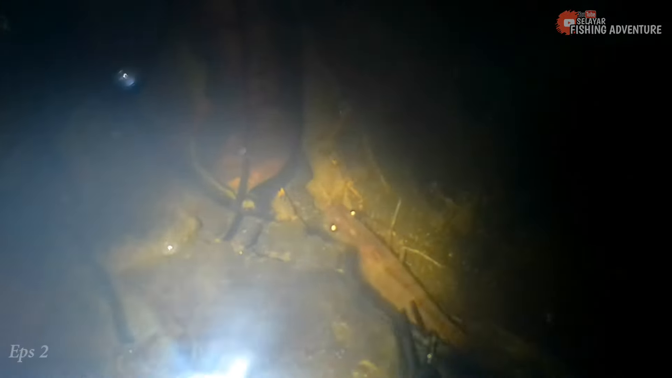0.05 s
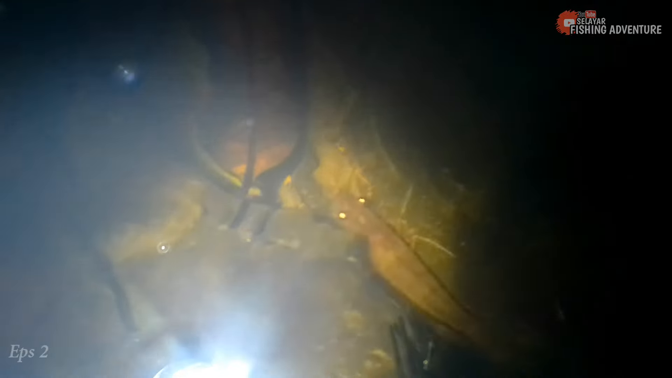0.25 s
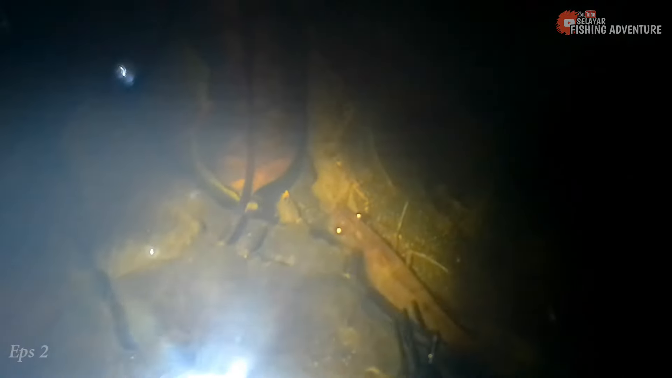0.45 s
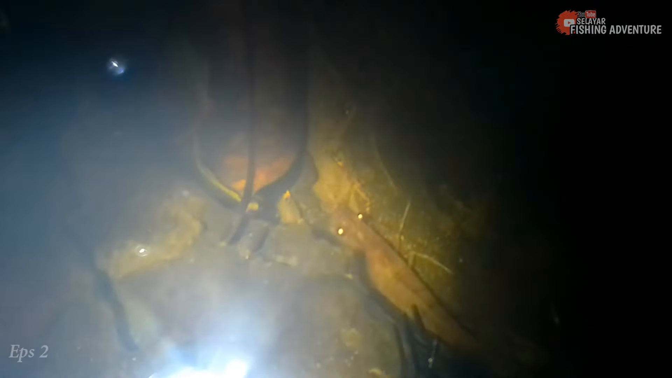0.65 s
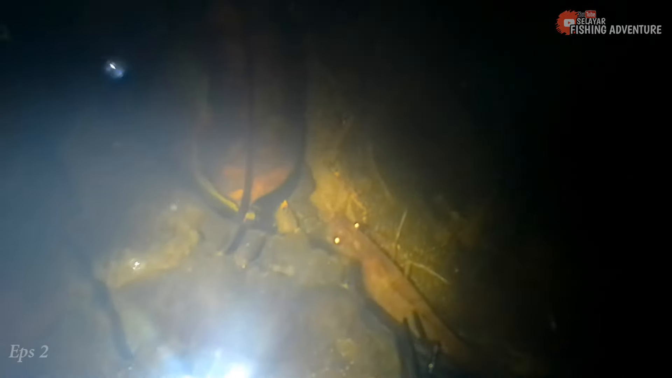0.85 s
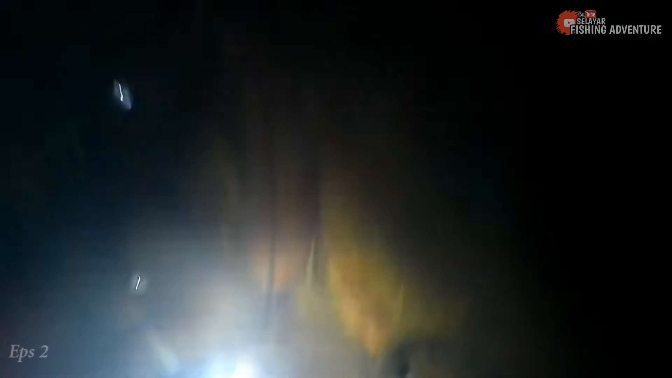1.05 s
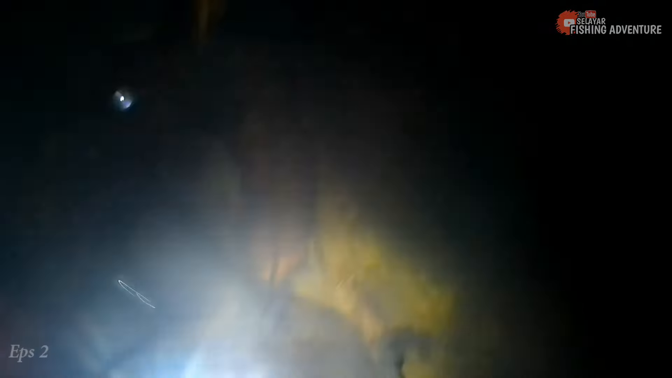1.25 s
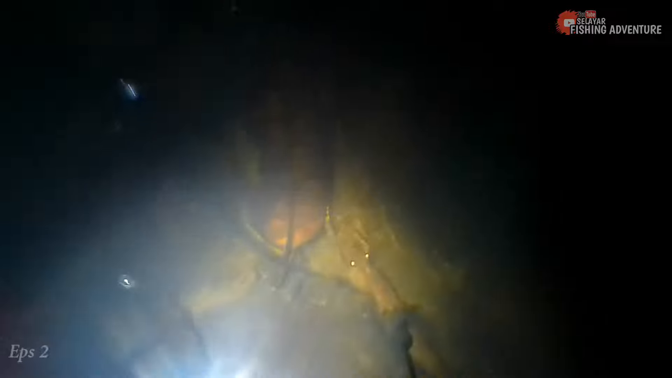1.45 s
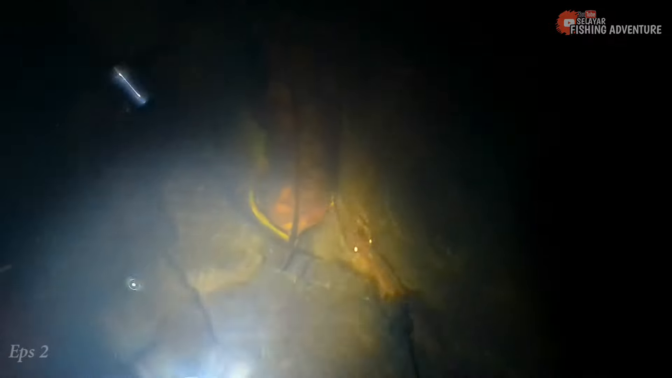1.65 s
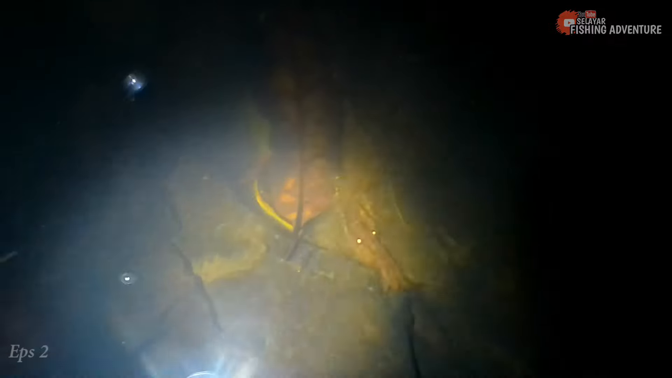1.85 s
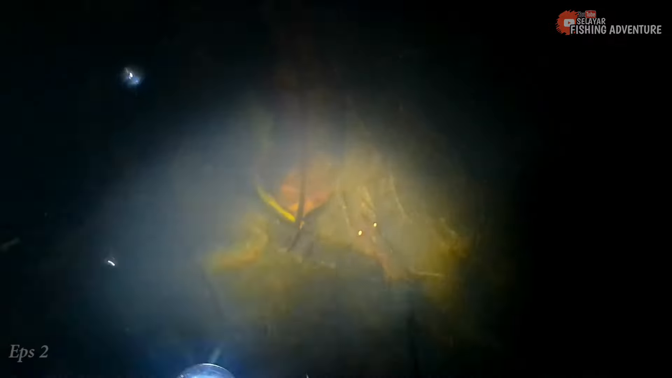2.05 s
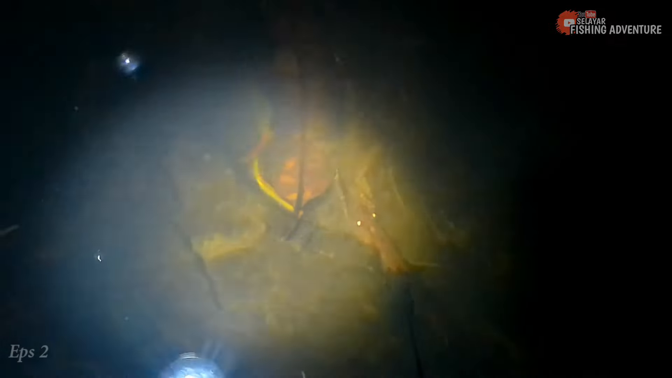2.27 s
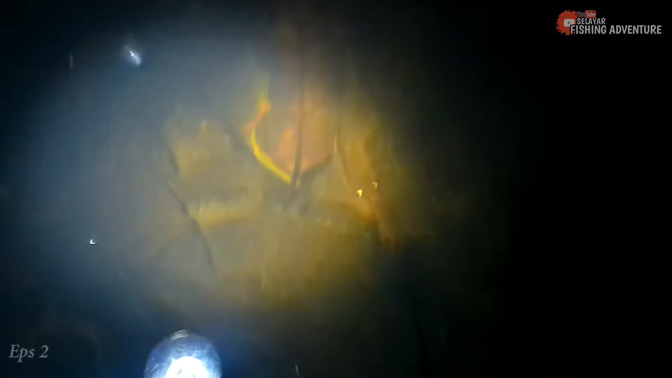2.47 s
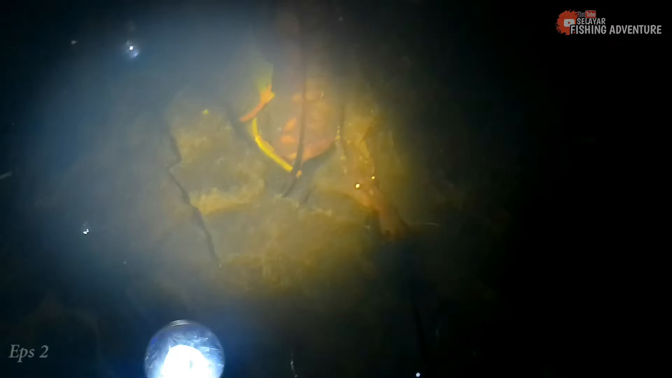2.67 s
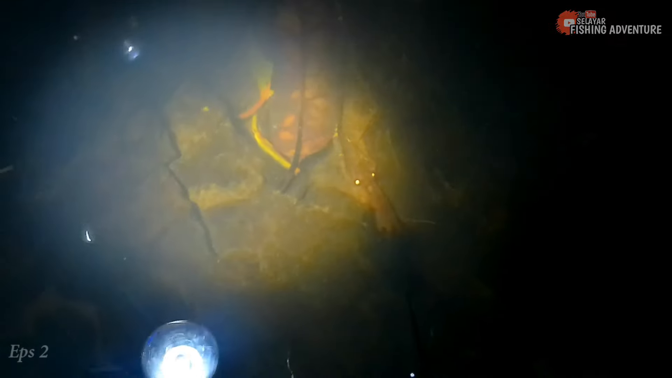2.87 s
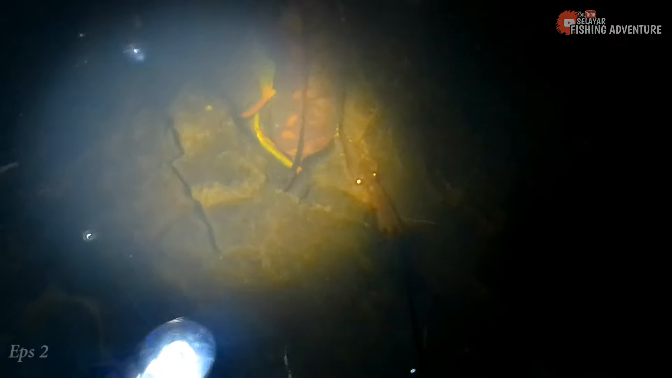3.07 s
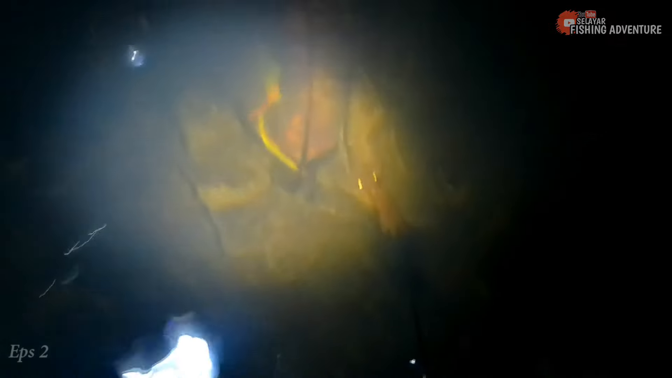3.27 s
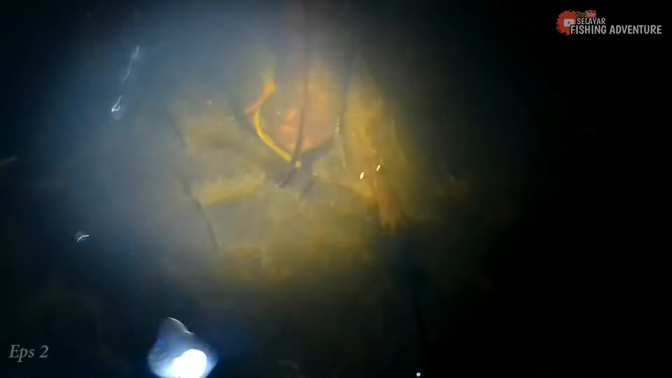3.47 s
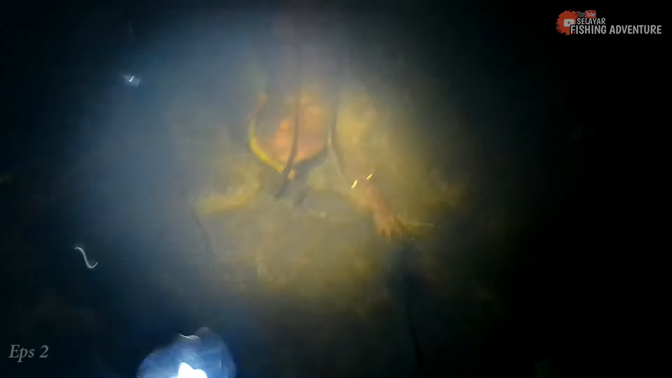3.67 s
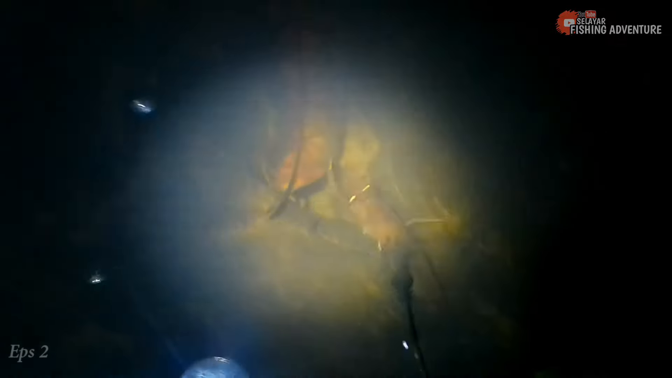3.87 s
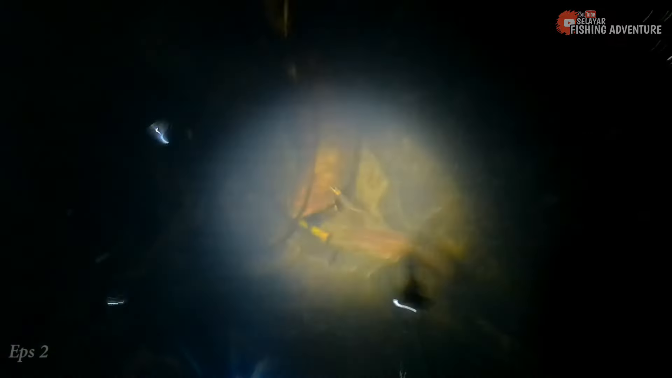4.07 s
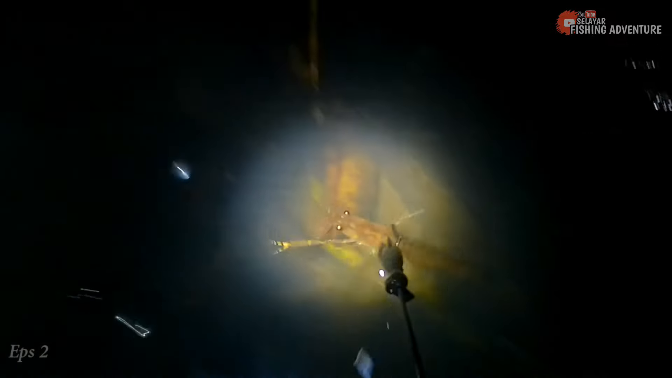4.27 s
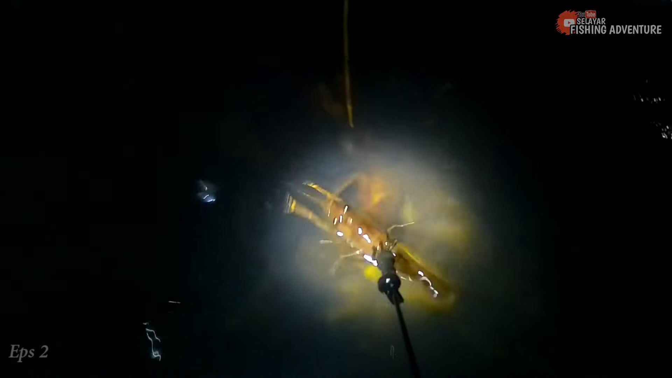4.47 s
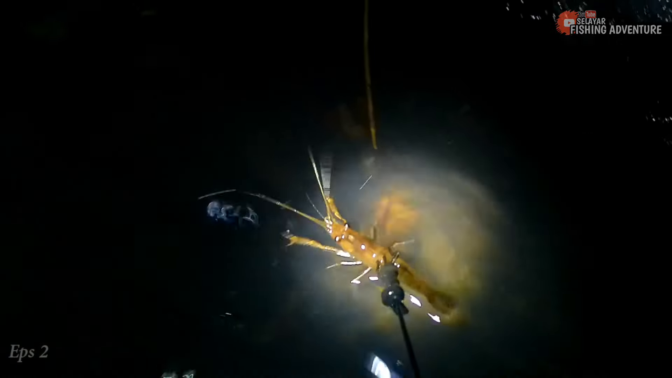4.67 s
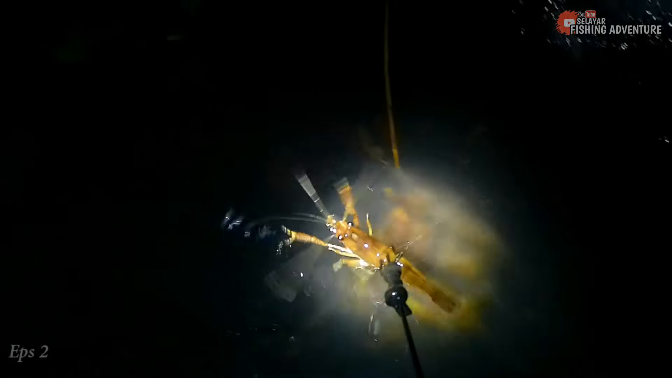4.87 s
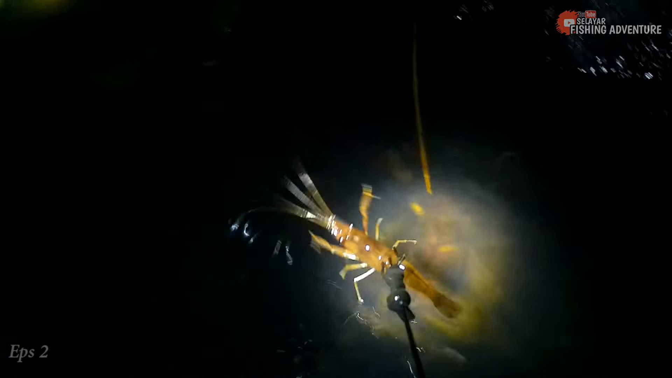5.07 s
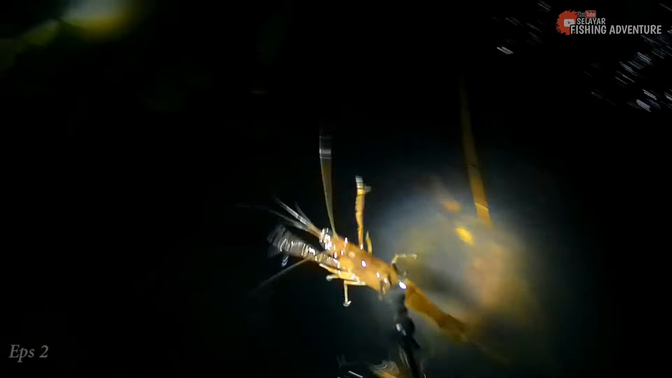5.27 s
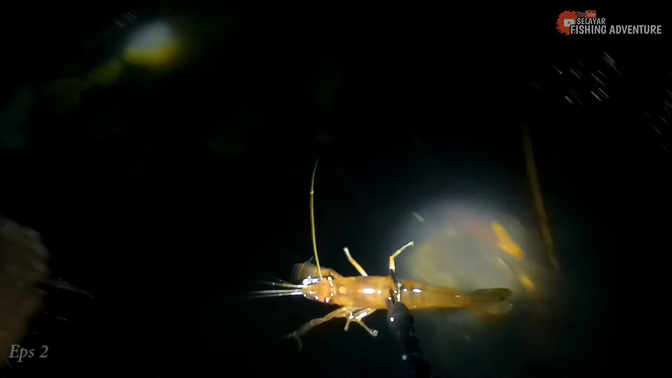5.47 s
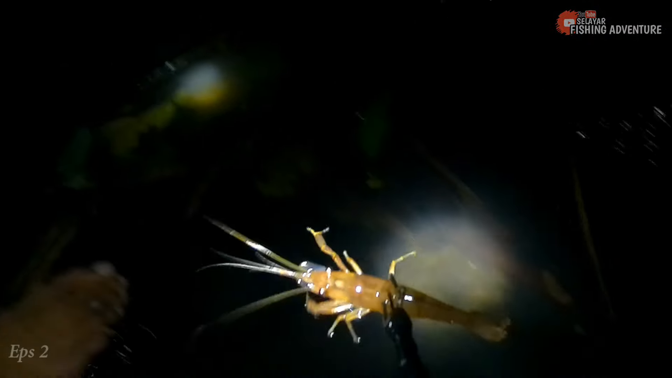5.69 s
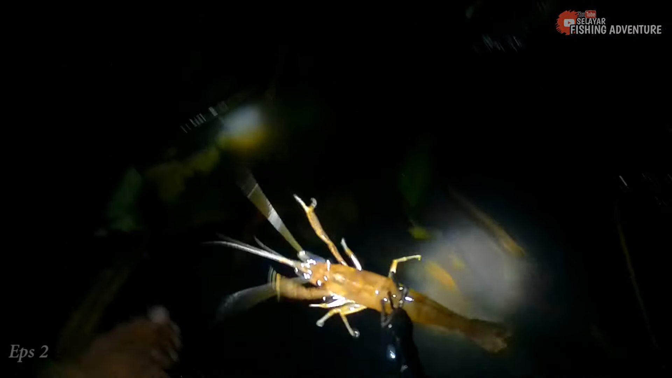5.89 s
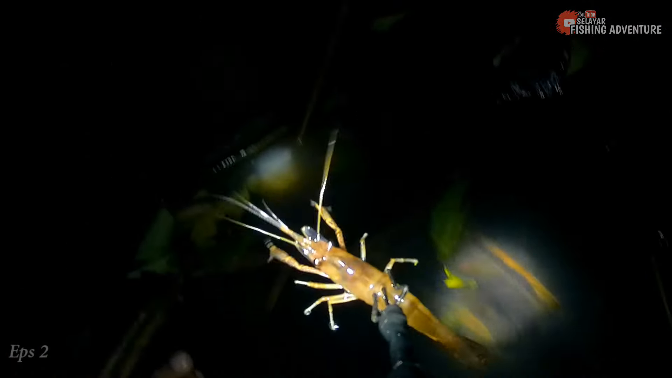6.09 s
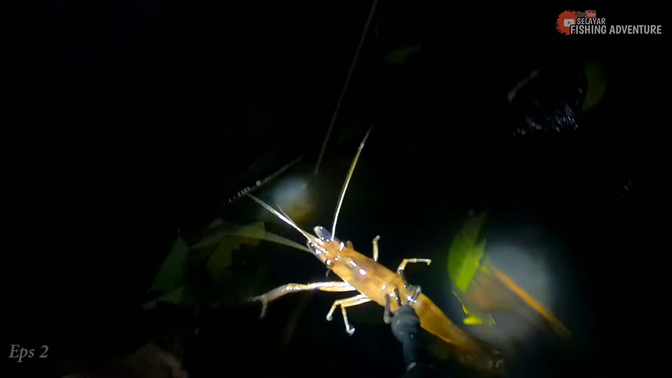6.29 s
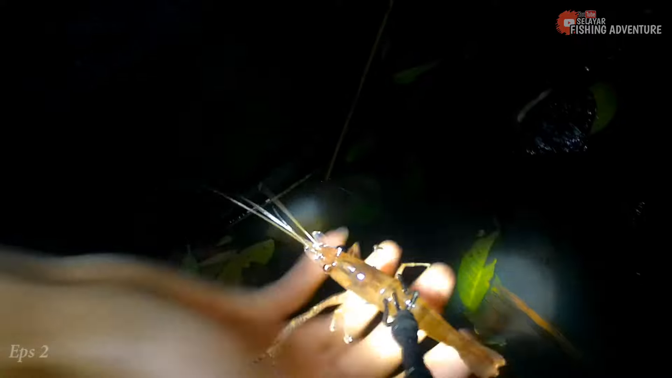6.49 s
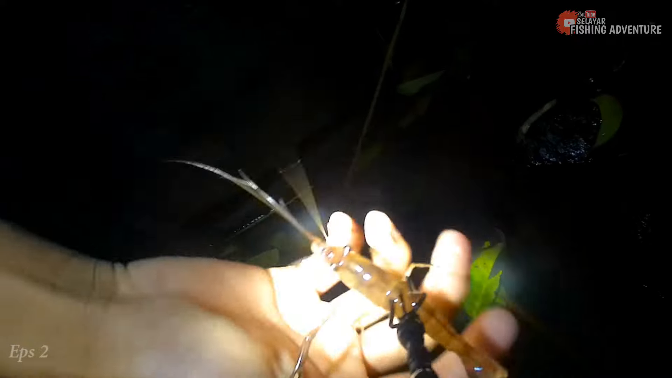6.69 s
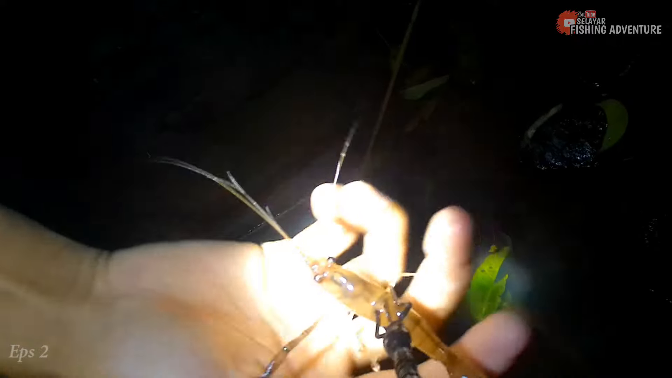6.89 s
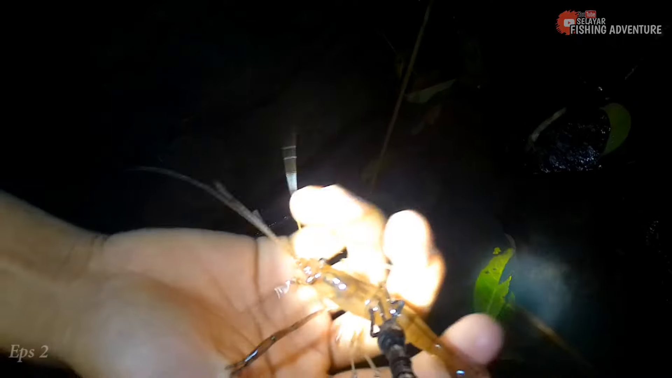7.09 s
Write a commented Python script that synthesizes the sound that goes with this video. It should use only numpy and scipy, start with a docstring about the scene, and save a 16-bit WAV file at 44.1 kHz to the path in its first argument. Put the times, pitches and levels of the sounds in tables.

```python
"""A waterproof camera in a river

A camera in a plastic case is handled at night, under water and lifted out of it. Water washes and
glugs along the shell while fingers stroke and tap it, so that it rings and sways. Two hard, rattling
knocks overload the microphone. In the pauses there is only a faint hiss and the camera's own ticking."""
import sys
import numpy as np
from scipy import signal
from scipy.fft import rfft, irfft
from scipy.io import wavfile
from scipy.ndimage import uniform_filter1d

SR = 44100
rng = np.random.default_rng(int(sys.argv[2]) if len(sys.argv) > 2 else 0)


def store_wav(level_fs):
    """Save 16-bit WAV to argv[1]."""
    pcm = np.round(np.clip(np.atleast_2d(level_fs), -1, 1) * 32767)
    wavfile.write(sys.argv[1], SR, pcm.T.astype(np.int16))


N = 314641
TIME = np.arange(N) / SR
RING_TIME = np.arange(SR // 4) / SR

# Levels are relative. "Boom" and "edge" say how much louder the walls and the edge are than the shell.
# notes the case rings at: f/Hz, level/dB, time to fade by 60 dB/s
CASE_NOTES = [(252, -12, 0.098), (376, -20.5, .1), (386, -17, .09), (473.1, -25, 0.13), (536.8, -18, 0.02),
              (585.3, -3, 0.025), (625.8, -14, 0.07), (797, 0, 0.011), (1134, -14.5, 0.002),
              (1220, 1, 0.013), (1410, -8, 0.021), (1560, 2, 0.012), (1743, -7, 0.013),
              (1937, -12.5, 0.028), (2568, -7, 0.0074), (3701, -19, .008), (4196, -15.5, .008),
              (6260, -26.5, 0.014)]
# hard blows that make up the knocks: t/s, level/dB, time to fade to 37%/s, boom/dB
BLOWS = [(1.0635, 5, 0.013, -5), (1.073, 10.5, 0.0098, -5), (1.087, 2, 0.022, -15),
         (1.104, -4, 0.0034, -16), (1.120, 6.5, .013, -5.5), (1.150, -9.5, 0.011, -5),
         (1.163, 6, 0.0097, -3), (1.2018, -2.5, 0.008, -1), (1.2431, -6.5, 0.0022, 1),
         (3.309, -15, 0.0064, -18), (3.317, -1.5, 0.009, -15.5), (3.322, 6.5, 0.011, -3),
         (3.337, -0.5, 0.0082, 0.5), (3.348, 2.5, 0.0088, -18.5), (3.365, -4.5, 0.0084, -7),
         (3.373, -5.5, 0.0082, -4.5), (3.4022, 0, 0.0053, -14.5), (3.413, -39.5, 0.0053, 25.5),
         (6.642, -18, 0.00053, -4)]
# finger taps and creaks: t/s, level/dB, f/Hz, half-length of the skid/s, boom/dB, edge/dB
TAPS = [(.0958, -22, 1640, 0.0015, 8.5, -18), (0.1117, -29, 1750, 0.0018, -1, -47),
        (.139, -31.5, 1760, 0.0018, 4, -21), (1.924, -16, 1297, 0.0012, -11, -40),
        (2.378, -25, 1400, 0.0013, 2, -25), (2.396, -8, 1450, .0014, -6, -17.5),
        (2.535, -15, 1400, 0.0011, -12, -56), (2.575, -12.5, 1224, 0.0019, -9.5, -60),
        (2.594, -15, 1480, 0.00085, 2, -27), (2.6181, 3.5, 1515, 0.0025, -14, -32),
        (2.622, -3.5, 1355, 0.0016, -3.5, -25), (2.654, -15, 1606, 0.0012, -5, -13),
        (2.737, -26, 1400, 0.0022, -3, -39), (2.962, -31, 1240, 0.0031, -11, -17),
        (3.02, -25.5, 1373, 0.0022, 3, -17), (3.137, -25, 1560, 0.0012, -13, -21.5),
        (3.549, -22, 1487, 0.0013, -24, -45.5), (3.757, -41.5, 1590, .003, -14, -40),
        (3.839, -36, 1470, 0.0015, -13.5, -36), (4.06, -29.5, 1410, .0014, 9, -48.5),
        (4.155, -9, 1376, 0.0013, -14.5, -36), (4.236, -12.5, 1220, .0022, -8.5, -60),
        (4.638, -33, 1447, .002, -8, -49.5), (4.664, -22.5, 1380, 0.0011, -3, -55),
        (5.091, -12, 1436, 0.0013, -9, -43), (5.318, -4, 1560, 0.0014, -11.5, -25.5),
        (5.324, -9.5, 1310, 0.0018, -26, -18.5), (5.435, -13, 1640, 0.0032, -11, -15),
        (5.546, -15.5, 1520, 0.0028, -8.5, -14), (5.815, -25.5, 1450, 0.0014, -13, -45),
        (6.198, -21.5, 1619, .0014, -29, -50), (6.205, -24, 1450, .0014, -17, -52),
        (6.637, -6.5, 1242, 0.0017, -14.5, -41), (6.6425, 2.5, 1370, 0.0013, -20.5, -33.5),
        (6.682, -10.5, 1230, 0.0019, -18.5, -51), (6.776, -17, 1340, 0.0017, -22.5, -61),
        (6.792, -8, 1424, 0.0029, -13, -47), (6.8393, -6, 1445, 0.002, -13, -53),
        (6.865, -24, 1410, 0.0008, -6.5, -51.5), (6.898, -20.5, 1410, 0.0049, -6, -40),
        (6.913, -12.5, 1530, 0.0045, -14, -32), (6.928, -7.5, 1710, 0.0034, -15.5, -35.5),
        (6.958, -30.5, 1810, 0.00064, 1, -23), (6.985, -33, 1570, .0012, -18.5, -46.5),
        (7.008, -32, 1560, 0.0018, -18, -48), (7.04, -21, 1406, .0012, -14, -57)]
# finger strokes: t/s, length/s, level/dB, swell from start to end/dB, boom/dB, edge/dB, sway level/dB
STROKES = [(.1, 0.051, -41, -22.5, -2.5, -26, -37), (0.549, 0.022, -68.5, -3.5, -10.5, -14, -81),
           (1.101, .115, -26, -12.5, -2, -13, -15.5), (1.25, 0.012, -30.5, -5.5, -2, -17.5, -32),
           (1.409, .11, -47.5, -1, 4, -15, -36), (1.658, 0.13, -47, -0.5, 5, -17, -40.5),
           (1.909, 0.031, -52, 6, 7, -15, -42.5), (2.178, 0.13, -59.5, -9.5, -8, -15.5, -59.5),
           (2.373, 0.047, -35, 0.5, -1.5, -22.5, -28.5), (2.446, 0.037, -35, 4, -5.5, -30, -48),
           (2.492, 0.1, -31.5, 13.5, -7, -43, -43), (2.641, 0.028, -30, 2.5, 3, -17, -49),
           (2.732, 0.059, -36.5, 5, -0.5, -22.5, -36), (2.998, .024, -36.5, 11, 2, -27, -41),
           (3.098, 0.041, -33.5, 7.5, -6, -38, -40.5), (3.253, 0.055, -48, 21, -14, -48, -44),
           (3.448, .13, -43, -8, 4, -30, -51.5), (3.766, .02, -48, -8, 4, -33, -51),
           (3.805, 0.052, -40.5, -18, 3.5, -27.5, -51.5), (3.923, 0.013, -52, -12.5, 14.5, -33, -42),
           (4.055, 0.011, -36.5, 16, -1, -32, -48), (4.16, 0.0095, -38.5, -14, 4, -19.5, -37.5),
           (4.232, 0.012, -40.5, -6, -2, -40, -53), (4.408, .12, -63.5, 1.5, -7, -21, -67.5),
           (4.632, 0.026, -48, -11.5, -4, -48, -77), (4.998, 0.1, -41.5, 17.5, -0.5, -26.5, -46.5),
           (5.222, 0.11, -30.5, 11.5, -8, -31.5, -48), (5.321, 0.081, -26.5, -13.5, -9, -23, -42.5),
           (5.404, 0.15, -24, 4.5, -7, -22, -34.5), (5.555, 0.062, -31.5, -10, -5.5, -21.5, -42),
           (5.689, 0.057, -74, -0.5, -10, -12, -70), (5.804, .12, -42, 4, -4, -29, -44.5),
           (6.472, 0.024, -67, 0, -18.5, -5, -77.5), (6.647, 0.0099, -40.5, -7.5, -7.5, -11, -53),
           (6.845, 0.017, -42, -10, 2, -25, -51), (6.957, 0.012, -37, -12, 0.5, -29, -58),
           (7.051, 0.016, -38.5, 12, 1, -38, -72)]
# water moving along the case: t/s, wash level/dB, sway level/dB
WATER_FLOW = [(0, -105, -67), (.8, -105, -74), (1.05, -92, -60), (1.26, -50.5, -23), (1.36, -64, -39.5),
              (1.63, -51, -49), (1.85, -71, -45), (1.98, -67, -41), (2.12, -88.5, -72), (2.34, -73.5, -60),
              (2.43, -56, -40), (2.87, -66.5, -69), (3.08, -59, -45), (3.2, -79, -62.5), (3.45, -52.5, -46),
              (3.64, -60, -51), (3.8, -57, -54.5), (3.9, -63, -59.5), (4.04, -59, -48), (4.12, -78, -55.5),
              (4.36, -100, -71.5), (7.13, -108, -78)]
# jolts of the whole case: t/s (at their strongest), level/dB, f/Hz
JOLTS = [(0.111, -30.5, 60.5), (1.079, -1, 78), (1.104, -5.5, 45.4), (1.182, -4.5, 43.2),
         (1.223, -18, 44.7), (1.454, -31, 74), (1.504, -27, 71.7), (1.776, -19.5, 68.4), (1.93, -31, 54.2),
         (2.411, -33, 72.6), (2.786, -28, 45.7), (3.142, -28, 53.7), (3.327, -16.5, 100),
         (3.431, -13.5, 44.2), (3.938, -30.5, 48.5), (4.187, -23, 57.87), (5.91, -28.5, 46.14)]
# low rumble of the swaying case: f/Hz, level/dB
SWAY_SPECTRUM = [(15, -17), (30, -9.5), (42, 2), (70, -2.5), (100, -13), (160, -19.5), (260, -24),
                 (500, -59.5), (1500, -100)]
# water slapping a wall of the case: t/s, level/dB, f/Hz, time to fade to 37%/s
GLUGS = [(.0945, -8.5, 545, 0.0045), (0.116, -36.5, 379, 0.027), (0.124, -41.5, 531, 0.031),
         (1.175, -10, 490, 0.013), (1.248, -24, 217.5, 0.029), (1.925, -12.5, 605, 0.0039),
         (2.391, -17, 186, 0.0045), (2.625, -47, 529, 0.01), (3.004, -14, 517, 0.0038),
         (3.133, -27.5, 381, 0.016), (3.484, -29.5, 517, 0.018), (3.549, -25.5, 545.6, 0.012),
         (3.917, -39, 396, 0.023), (4.03, -37.5, 361.7, 0.028), (4.239, -47, 378, 0.01),
         (4.664, -30.5, 381.8, 0.014), (4.998, -30.5, 578, 0.007), (5.05, -31.5, 526, 0.021)]
# notes the ticking mechanism rings at: f/Hz, level/dB, time to fade by 60 dB/s
TICK_NOTES = [(490, -19.5, 0.045), (1300, -19, .01), (2190, -1, 0.027), (2270, -3, 0.035),
              (4482, -14, 0.033), (5640, -21.5, .006)]
# steady background hiss: f/Hz, level/dB
HISS_SPECTRUM = [(20, 8), (45, -3.5), (90, -11.5), (200, -16.5), (500, -24.5), (800, -24), (2000, -32.5),
                 (3500, -34), (7000, -40.5), (16000, -47.5)]


def knocking(walls, shell, edge, edge_db=-19, shove_db=-12):
    """Each blow is a dying burst of hard contacts that also shoves the whole case."""
    out = np.zeros(N)
    struck = band(shell, 1100, 2300, order=1)  # a hard contact favours the shell's higher notes
    shove = band(signal.unit_impulse(len(RING_TIME)), 130, 280, order=2)
    for start, db, fade_s, boom in BLOWS:
        chatter = rng.choice([-1, 1], len(RING_TIME)) * np.exp(-RING_TIME / fade_s)
        clack = shake(chatter, struck)
        thud = shake(chatter, walls) + amp(shove_db) * shake(chatter, shove)
        click = shake(chatter, edge)
        add(out, start, amp(db) * (clack + amp(boom) * thud + amp(edge_db) * click))
    return out


def tapping(walls, shell, edge, gain_db=-2.5, boom_db=-1, edge_db=-2, roughness=2.77):
    """A fingertip catches and lets go: a brief flutter near one pitch inside a longer, gritty skid."""
    out = np.zeros(N)
    t = np.arange(-500, 501) / SR
    for middle, db, hz, skid_s, boom, edge_level in TAPS:
        grit = rng.standard_normal(len(t)) / np.cosh(t / skid_s) * np.hanning(len(t))
        flutter = np.exp(-.5 * (t / (.63 * skid_s)) ** 2) * np.cos(2 * np.pi * hz * t)
        clack = strike(flutter + roughness * grit, shell)
        thud = amp(boom + boom_db) * strike(grit, walls)
        click = amp(edge_level + edge_db) * strike(grit, edge)
        add(out, middle + t[0], amp(db + gain_db) * (clack + thud + click))
    return out


def rubbing(walls, shell, edge, edge_lift_db=1):
    """Skin and water drag over the case; the same tiny slips ring all of its parts."""
    wall_db, shell_db, edge_db = pressing()
    drag = gurgle(slips())
    rub = shake(drag * amp(shell_db), shell)
    boom = shake(drag * amp(wall_db), walls)
    scratch = shake(drag * amp(edge_db + edge_lift_db), edge)
    return (rub + boom + scratch)[:N]


def slips(per_s=1600, spread_db=3.2):
    """Sticking and slipping makes a stream of tiny pushes of uneven size."""
    size = amp(spread_db * np.minimum(rng.exponential(1, N), 4))
    return unit_power(size * rng.choice([-1, 1], N) * (rng.random(N) < per_s / SR))


def gurgle(sound, depth_db=3.8):
    """Shifting fingers and water press unevenly on the case, so its notes swell and fade in patches."""
    spectra = signal.stft(sound, nperseg=1024, noverlap=768)[2]
    patches = rng.standard_normal(spectra.shape[::-1]).T
    for size in (4, 5):  # blur across pitch and time
        patches = uniform_filter1d(uniform_filter1d(patches, size, axis=0), size, axis=1)
    gain = amp(depth_db * (unit_power(patches) - 1))
    return signal.istft(spectra * gain, nperseg=1024, noverlap=768)[1][:N]


def pressing():
    """How hard water and fingers push the walls, shell and edge, in dB; the strongest contact wins."""
    times, wash_db, _ = np.transpose(WATER_FLOW)
    shell = np.interp(TIME, times, wash_db)
    walls, edge = shell + 6, shell - 18.5  # water mostly stirs the walls, hardly the edge
    for start, length, db, swell, boom, edge_level, _ in STROKES:
        level = db + stroke_shape(start, length, swell, rise_db_per_s=2800, fall_db_per_s=1150)
        shell = np.maximum(shell, level)
        walls = np.maximum(walls, level + boom)
        edge = np.maximum(edge, level + edge_level)
    return walls, shell, edge


def stroke_shape(start, length, swell_db, rise_db_per_s, fall_db_per_s):
    """One stroke in dB: it builds up, swells or fades evenly over its length, then dies away."""
    hold = swell_db * (np.clip((TIME - start) / length, 0, 1) - .5)
    before = rise_db_per_s * np.maximum(start - TIME, 0)
    after = fall_db_per_s * np.maximum(TIME - start - length, 0)
    return np.maximum(hold - before - after, -200)


def case_parts():
    """The three voices of the case: booming walls, the hollow clack of the shell, a thin edge."""
    whole = ring(CASE_NOTES)
    high = ring([note for note in CASE_NOTES if note[0] > 2200])
    return band(whole, 370, 900, order=3), band(whole, 1000, 2022, order=4), band(high, 1200, 5200, order=3)


def wobbling(rise_s=.016, gain_db=-1):
    """The case swings for a few slow cycles after each jolt."""
    out = np.zeros(N)
    age = RING_TIME / rise_s
    swell = (age * np.exp(1 - age)) ** 2
    for peak_s, db, hz in JOLTS:
        add(out, peak_s - rise_s, amp(db + gain_db) * swell * np.sin(2 * np.pi * hz * RING_TIME))
    return out


def swaying(lag_s=.01):
    """Water and strokes rock the heavy case: it rumbles, follows each stroke late and settles slowly."""
    times, _, flow_db = np.transpose(WATER_FLOW)
    level = np.interp(TIME, times, flow_db)
    for start, length, _, swell, _, _, db in STROKES:
        shape = stroke_shape(start + lag_s, length, swell, rise_db_per_s=998, fall_db_per_s=482.5)
        level = np.maximum(level, db + shape)
    return amp(level) * coloured_noise(SWAY_SPECTRUM)


def glugging(rise_s=.0017, gain_db=2):
    """Each slap of water rings one low, hollow note with a soft start."""
    out = np.zeros(N)
    for start, db, hz, fade_s in GLUGS:
        swell = (1 - np.exp(-(RING_TIME / rise_s) ** 2)) * np.exp(-RING_TIME / fade_s)
        add(out, start, amp(db + gain_db) * swell * np.sin(2 * np.pi * hz * RING_TIME))
    return out


def ticking(level_db=-58, spread_db=1.5, period_s=.054, jitter_s=.004, touch_s=.0012, rasp=.08):
    """A small mechanism in the camera ticks softly, not quite evenly."""
    out = np.zeros(N)
    body = band(ring(TICK_NOTES), 400, 6000, order=3)
    t = np.arange(-200, 201) / SR
    for count, (late, loud) in enumerate(rng.standard_normal((135, 2))):
        touch = (t == 0) + rasp * rng.standard_normal(len(t)) / np.cosh(t / touch_s)
        start = (count + .5) * period_s + jitter_s * late
        add(out, start, amp(level_db + spread_db * loud) * strike(touch, body))
    return out


def hiss(level_db=-67.5):
    """A faint, steady noise, strongest in the bass, lies under everything."""
    return amp(level_db) * coloured_noise(HISS_SPECTRUM)


def ring(notes):
    """Notes that die away after one sharp push."""
    return sum(amp(db) * np.exp(-np.log(1000) * RING_TIME / fade_s) * np.sin(2 * np.pi * hz * RING_TIME)
               for hz, db, fade_s in notes)


def shake(pushes, part):
    """Random pushes ring a part of the case and keep about the same power."""
    return signal.fftconvolve(pushes, part / np.linalg.norm(part))


def strike(push, part):
    """A short push rings a part; the result peaks at 1."""
    sound = signal.fftconvolve(push, part)
    return sound / abs(sound).max()


def coloured_noise(spectrum):
    """Noise of power 1 with the given balance of low and high pitches."""
    hz, db = np.transpose(spectrum)
    gain = amp(np.interp(np.log(np.fft.rfftfreq(N, 1 / SR) + 1), np.log(hz), db))
    return unit_power(irfft(rfft(rng.standard_normal(N)) * gain, N))


def band(sound, low_hz, high_hz, order):
    """Keeps the pitches between two limits."""
    return signal.sosfilt(signal.butter(order, [low_hz, high_hz], "band", fs=SR, output="sos"), sound)


def amp(db):
    """Turns decibels into a gain."""
    return 10 ** (np.asarray(db) / 20)


def unit_power(sound):
    """Scales to an average power of 1."""
    return sound / np.sqrt(np.mean(sound ** 2) + 1e-30)


def add(mix, start_s, sound):
    """Mixes a sound in at the given time."""
    part = mix[max(0, round(start_s * SR)):][:len(sound)]
    part += sound[:len(part)]


def scene():
    """Everything reaches one microphone through the case."""
    parts = case_parts()
    handling = rubbing(*parts) + tapping(*parts) + knocking(*parts) + wobbling() + swaying()
    return (handling + glugging() + ticking() + hiss())[None]


def record(dry, ceiling=.63, hardness=6.4, cutoff_hz=15900):
    """Loud peaks overload the microphone and are flattened; then the highest treble is cut."""
    clipped = dry / (1 + abs(dry / ceiling) ** hardness) ** (1 / hardness)
    low_pass = signal.firwin(511, cutoff_hz, window=("kaiser", 9), fs=SR)
    return signal.oaconvolve(clipped, low_pass[None], "same")


dry = scene()
out = record(dry)
store_wav(out)
```